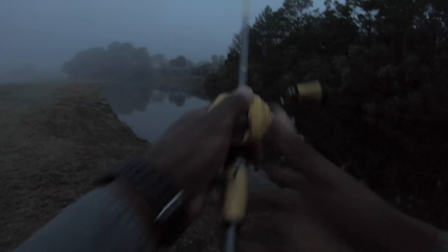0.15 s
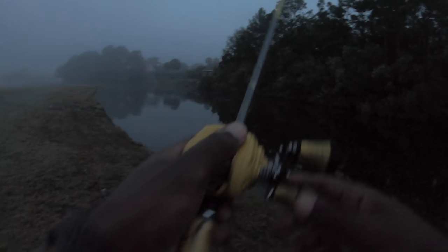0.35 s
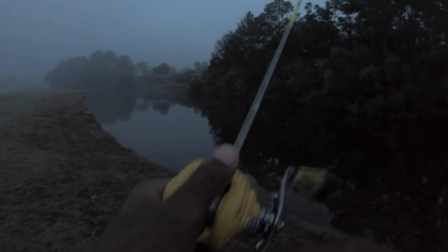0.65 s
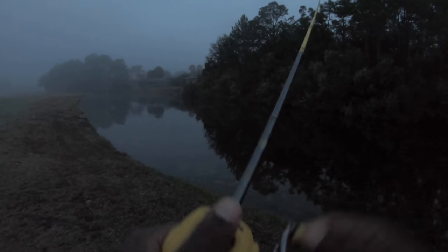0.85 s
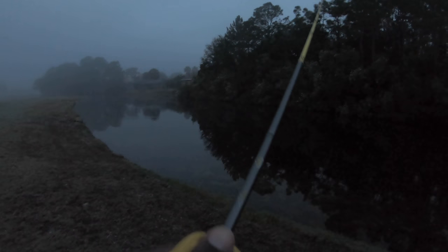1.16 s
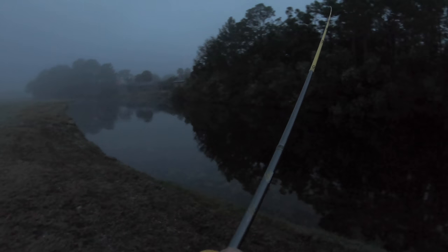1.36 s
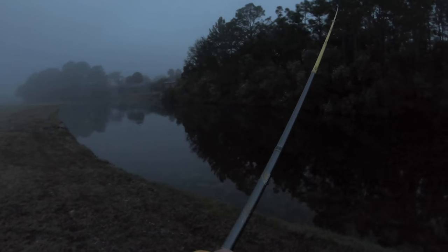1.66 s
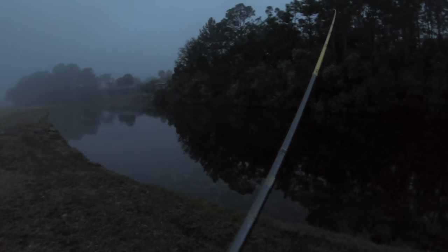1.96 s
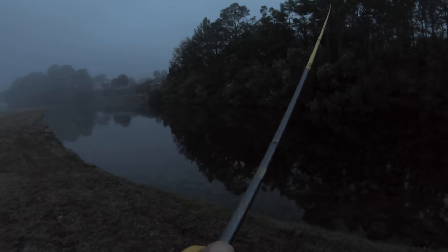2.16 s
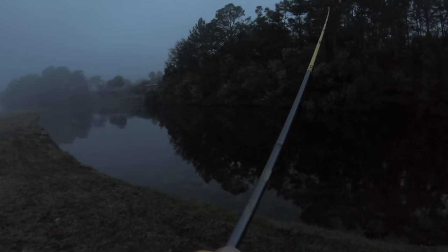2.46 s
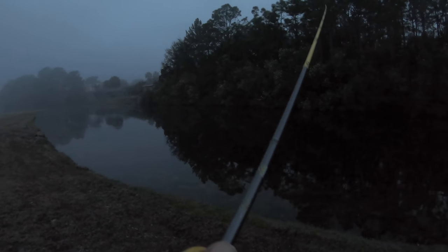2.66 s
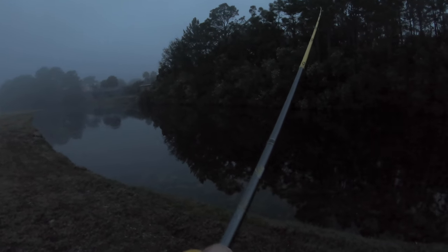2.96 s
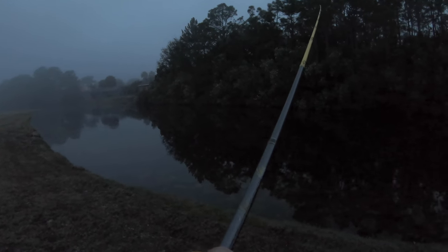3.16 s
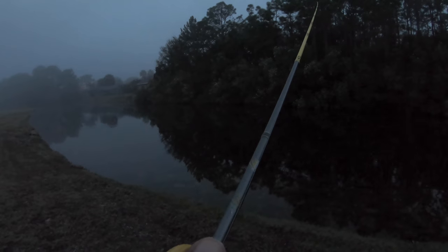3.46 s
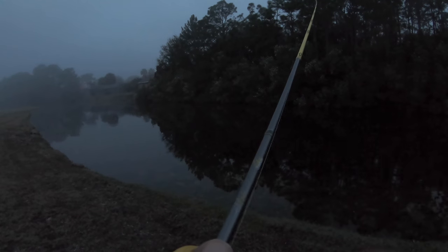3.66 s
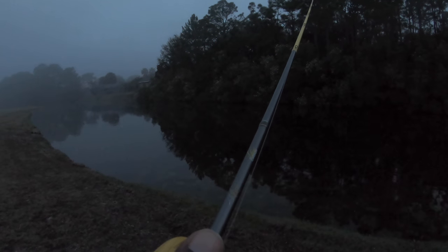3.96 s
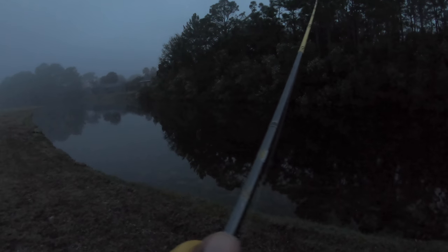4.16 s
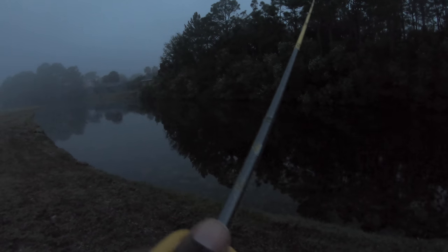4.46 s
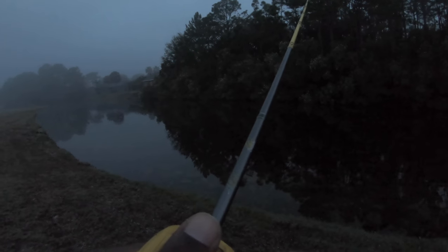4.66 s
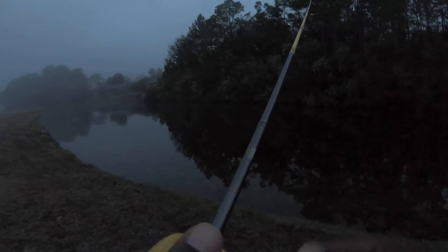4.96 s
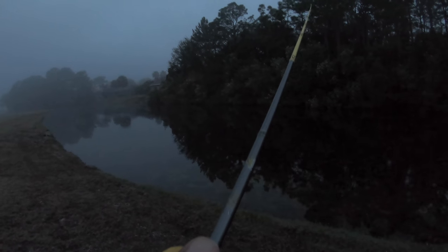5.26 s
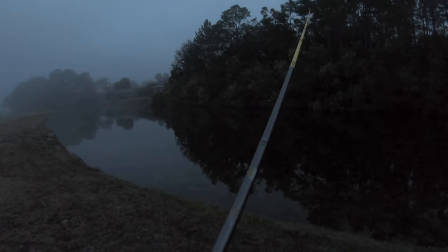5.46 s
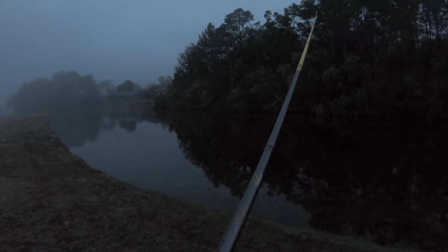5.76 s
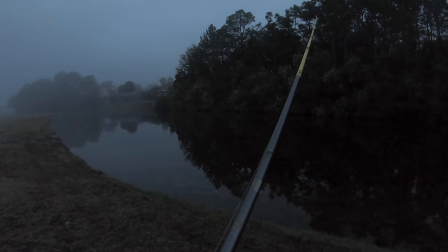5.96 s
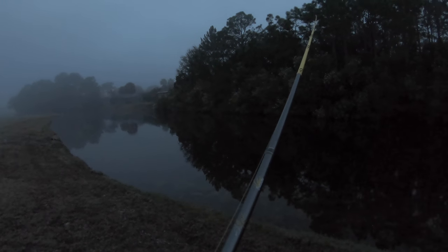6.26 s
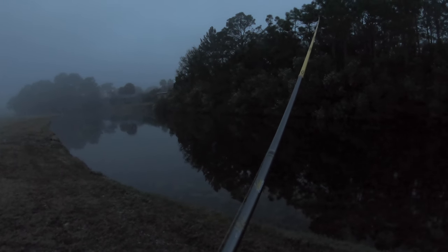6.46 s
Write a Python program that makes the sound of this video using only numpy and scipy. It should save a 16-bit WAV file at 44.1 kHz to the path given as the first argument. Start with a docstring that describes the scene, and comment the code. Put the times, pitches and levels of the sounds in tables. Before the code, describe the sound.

Close to the microphone, a hand scratches on a fishing rod and the reel clicks, then snaps into gear with a loud metallic clack. Slow winding follows, with tiny dry ticks and faint rustling swells. Around it, several songbirds whistle and chirp over each other, near and far, echoing softly from trees across a still pond, above faint air and a low wavering hum.

```python
"""Dawn birds and a fishing reel by a pond

Several songbirds whistle over each other, near and far: pure tones that follow pitch and level curves.
Trees answer them with sparse, decaying echoes. Close to the microphones a fishing reel clacks into gear
(jolts through metal resonances), then rustles and ticks as it is wound (swelling noise, tiny rings).
A hand scratches on the rod, the rod knocks low, and a wavering low hum and soft air lie beneath."""
import sys
import numpy as np
from scipy import signal
from scipy.fft import rfft, irfft, next_fast_len
from scipy.io import wavfile
from scipy.ndimage import uniform_filter1d

SR = 44100
rng = np.random.default_rng(int(sys.argv[2]) if len(sys.argv) > 2 else 0)


def store_pcm(level_fs):
    """Save levels as 16-bit WAV."""
    pcm = np.round(np.clip(level_fs, -1, 1) * 32767).astype(np.int16)
    wavfile.write(sys.argv[1], SR, np.atleast_2d(pcm).T)


N = 291501  # length in samples

# Syllables of the near bird: time_s from its start, pitch_hz before the pitch factor, relative level_db
SWOOP = [(0, 9400, -19), (.012, 8400, -6), (.022, 7260, 7.5), (.033, 5900, -4), (.041, 5330, -5),
         (.049, 5070, -14), (.06, 5060, -14)]
SAG = [(0, 2230, -10), (.02, 2150, -4), (.045, 1896, -3.5), (.068, 1740, -20)]
HOOK = [(0, 2270, 3.5), (.005, 2870, -8), (.009, 3220, 3.5), (.017, 3330, 6.5), (.026, 3250, 3),
        (.033, 2950, -17)]
# Syllables of the chipping and the sliding bird: time_s, pitch_hz before the factor, relative level_db
CHIP = [(0, 5700, -14), (.002, 6590, 9.5), (.005, 7270, 10.5), (.008, 7700, 11.5), (.011, 7640, -24)]
SLIDE = [(0, 5450, -10), (.008, 4600, -14), (.02, 4250, -10), (.04, 3980, -4.5), (.058, 3680, -11.5),
         (.082, 3300, -8)]
# Syllables of birds at middle distance: time_s, pitch_hz before the factor, relative level_db
DIP = [(0, 2824, -6.5), (.015, 2742, -3.5), (.035, 2520, -9)]
CLIMB = [(0, 2336, -20), (.025, 2620, -4.5), (.045, 2900, -2.5), (.07, 3070, -12), (.11, 3170, -8.5),
         (.15, 3222, -16), (.2, 3195, -19)]
CROOK = [(0, 2745, 2.5), (.016, 3330, -1.5), (.032, 3130, 1.5), (.052, 2730, 3), (.07, 2630, 0.5),
         (.1, 2660, -2), (.12, 2484, -12)]
GLIDE = [(0, 2970, -15), (.09, 2665, -5), (.12, 2510, -1.5), (.16, 2300, -2), (.19, 2150, -8)]
WAVE = [(0, 2268, -4), (.018, 2420, 0), (.043, 2080, -12), (.078, 2170, -6), (.108, 2337, -3),
        (.116, 2600, -6), (.126, 2160, -8), (.168, 2020, -12)]
TRILL = [(0, 2295, -2), (.02, 2680, -4.5), (.039, 2270, -1), (.051, 2646, -6), (.065, 2226, -4),
         (.079, 2535, -6), (.095, 2300, -5), (.115, 2134, -6)]
# When each syllable is sung: start_s, level_db added to the shape, pitch_factor, left_over_right_db
SWOOP_TIMES = [(0.046, -38, 1.04, -2.5), (0.311, -38, 1, -5), (0.573, -40.5, 1.014, -8.5),
               (0.834, -39.5, 0.99, -6), (1.096, -40, 1, -6.5), (1.361, -40, 0.98, -5)]
SAG_TIMES = [(.14, -47.5, 1.06, -14), (.4, -44.5, 1.04, -11), (.663, -51, 0.99, -23),
             (.925, -49.5, 0.99, -20.5), (1.188, -48, 1, -15), (1.453, -48, 0.97, -12.5),
             (1.745, -51, 0.94, -11)]
HOOK_TIMES = [(0.209, -47, 1.015, -0.5), (0.472, -48.5, 1.015, -3), (0.731, -46, 0.99, -8.5),
              (0.997, -48.5, 0.99, -7), (1.262, -49.5, .97, -8.5), (1.536, -52, .96, -13),
              (1.826, -59.5, 0.95, -14)]
CHIP_TIMES = [(.946, -48.5, 1, 1.9), (1.684, -47, 1, 2.2), (2.345, -45, 1, 2.7), (4.177, -46, 0.98, 2)]
SLIDE_TIMES = [(3.654, -57, 0.99, 0.0036), (4.021, -52.5, 0.99, 0.0053), (4.393, -53, 0.97, 0.0057),
               (4.751, -51.5, 0.99, 0.011), (5.117, -52.5, 0.99, 0), (5.408, -55, 0.95, 0),
               (5.675, -56, 0.92, 0.0056)]
DIP_TIMES = [(3.741, -50.5, 0.95, 0), (4.113, -49.5, 0.95, 0), (4.48, -49, 0.97, 0), (4.85, -48.5, 0.96, 0),
             (5.215, -50, 0.99, 0.0093)]
CLIMB_TIMES = [(3.83, -50.5, 0.96, 0), (4.203, -49, 0.98, 0), (4.563, -50, 0.96, 0.0043),
               (4.932, -49.5, 0.96, 0), (5.298, -52.5, 0.95, 0.0066)]
CROOK_TIMES = [(5.742, -55.5, 0.98, 3.3), (6.239, -56, 0.99, 6.7)]
GLIDE_TIMES = [(3.31, -57, 1.0, 19)]
WAVE_TIMES = [(3.742, -52, 0.99, 12.6)]
TRILL_TIMES = [(3.985, -53, 1.0, 14.6)]
# Single slurred notes, mostly from birds at middle distance; the row at 1.656 s is the near bird's last, slower
# swoop: start_s, length_s, first_hz, middle_hz, last_hz,
SLURRED_NOTES = [(0.332, 0.041, 2280, 2164, 1940, -57, 11), (0.455, 0.024, 3710, 3950, 3700, -56.5, 5),
                 (.515, 0.063, 4000, 3640, 3270, -62, -2), (1.592, .05, 2296, 2600, 2660, -59.5, -2),
                 (1.656, .058, 6950, 5250, 4650, -55, -5), (1.783, 0.066, 2620, 2300, 2830, -60.5, 8),
                 (2.053, 0.039, 2540, 2720, 2840, -63, 10), (2.706, 0.067, 2810, 3150, 3630, -58, 6),
                 (3.339, 0.064, 3160, 3450, 3810, -68.5, 21), (3.548, 0.053, 2800, 2430, 2290, -64.5, 19),
                 (3.604, 0.055, 2210, 2440, 2180, -56, 12), (4.131, 0.032, 2570, 2220, 2300, -57.5, 9),
                 (4.384, 0.091, 1967, 2115, 1960, -62.5, 8), (4.809, .085, 1954, 2050, 1930, -62.5, 8),
                 (5.45, 0.062, 2520, 2320, 2620, -57, -2), (5.5, 0.031, 2610, 2510, 2380, -60, -9),
                 (5.585, 0.052, 2295, 2700, 2990, -55, -7.5), (5.665, 0.074, 2420, 1980, 1840, -63.5, 7),
                 (5.925, .06, 2220, 1970, 1750, -66, 12), (5.932, 0.0317, 3550, 3300, 2800, -58, 6),
                 (5.962, 0.026, 3290, 3780, 3250, -65, 7), (5.997, 0.045, 3400, 3200, 3050, -58.5, 3),
                 (6.036, 0.039, 2090, 2290, 2200, -59.5, 10), (6.154, 0.027, 3270, 3150, 3060, -65, 3),
                 (6.197, .03, 3070, 3300, 3000, -62, -2), (6.171, 0.061, 2170, 1860, 1780, -61, 12),
                 (6.413, 0.058, 2124, 2000, 1780, -65, 13.5), (6.419, 0.064, 3070, 3050, 3110, -64, 0),
                 (6.49, 0.031, 3090, 3320, 2870, -58, 4), (6.53, 0.026, 3140, 3430, 3150, -67, 1)]
# Contacts on the reel: start_s, peak level_db before panning, brightest_hz, contact_s,
# left_over_right_db, left_lag_s
REEL_BLOWS = [(0.0381, -25.5, 1050, 0.000077, -17, .00001), (0.1223, -35, 3000, 0.00086, -5, .00003),
              (0.1449, -17.5, 3220, 0.0001, 1, 0.00002), (0.159, -29, 3300, 0.00076, -1, .00003),
              (0.169, -29, 3470, 0.0012, 6, 0.000033), (0.276, -37.5, 1000, 0.0011, -3, .00001),
              (0.6329, -13, 4870, 0.00037, -7.5, 0.000069), (0.6354, -3, 1900, 0.00013, 5.5, 0.0000089),
              (0.6375, -6, 4470, 0.0011, 1, 0.000034), (0.6382, -5, 6370, 0.0014, -6, 0.000035),
              (0.642, -18, 2400, 0.0042, -9.5, .00003), (2.837, -44, 1500, 0.0023, -11, .00001),
              (3.511, -42, 3120, 0.00072, -19, .00001)]
# Resonances of the reel: pitch_hz, width_hz, relative level_db
REEL_MODES = [(880, 1700, -9.5), (1720, 480, -2.5), (2920, 220, -6), (3386, 180, -4), (3970, 490, -10),
              (4670, 430, -7.5), (5970, 500, -14), (7500, 350, -10.5), (7390, 250, -3.5), (9160, 180, -2),
              (10140, 470, -6.5), (10620, 610, -10), (13650, 1800, -18.5)]
# Clear gear ticks while winding: start_s, peak level_db before panning
GEAR_TICKS = [(0.8265, -40), (0.8619, -38), (0.929, -40.5), (1.0056, -40), (1.062, -44), (1.0807, -42),
              (1.184, -43), (1.279, -39.5), (1.4909, -41), (1.6212, -47), (1.733, -47), (1.807, -38.5),
              (1.8622, -46.5), (2.2836, -49), (2.3173, -43), (2.6645, -41.5), (2.8255, -47),
              (2.9157, -35.5), (3.0976, -40), (3.1977, -37.5), (3.23, -42.5), (3.4178, -43), (3.5498, -46),
              (3.633, -39), (3.8432, -41), (3.933, -35.5), (4.0008, -46.5), (4.0677, -50), (4.1644, -47),
              (4.4596, -43), (4.6216, -44), (4.7216, -40.5), (4.7945, -46), (4.81, -43), (4.9518, -45.5),
              (5.061, -45), (5.116, -39), (5.1294, -46), (5.1437, -34.5), (5.1856, -40.5), (5.2056, -45),
              (5.2344, -44), (5.2428, -35.5), (5.2644, -43), (5.28, -45), (5.3725, -36.5), (5.576, -36),
              (5.683, -41.5), (5.775, -37), (5.7905, -31), (5.8618, -40.5), (6.0485, -46.5), (6.1439, -44)]
# Resonances of a tick: pitch_hz, width_hz, relative level_db
TICK_MODES = [(4500, 3000, -20), (7300, 1200, -14), (8900, 600, -6), (9700, 500, 0), (14000, 2000, -27)]
# Turns of the handle: arrival_s, hold_s, rub level_db, fizz level_db, left_over_right_db of the rub
HANDLE_TURNS = [(0.023, 0.067, -50, -52.5, -8), (0.75, 0.05, -53, -60.5, -0.5),
                (1.127, 0.085, -58.5, -60, -4), (1.72, 0.088, -62, -69.5, -1.5),
                (2.255, .17, -64, -68.5, -0.5), (2.85, .07, -58, -64, -1.5),
                (3.5, 0.037, -57.5, -65.5, -1.5), (4.015, 0.12, -59.5, -67.5, -3),
                (4.646, 0.065, -57, -67.5, -1), (5.22, .16, -58.5, -64.5, -1.5),
                (5.848, 0.11, -58.5, -66.5, -2), (6.55, .1, -57, -68, -3.5)]
# Spectra of the rubbing and its fizz: pitch_hz, relative level_db per Hz
RUB_SPECTRUM = [(200, -64.5), (450, -21), (900, 1), (1500, 2.5), (2500, -2), (4500, -7.5), (7000, -52)]
FIZZ_SPECTRUM = [(2000, -2), (4000, -20.5), (7000, 4.5), (10000, -7.5), (11500, -20), (14500, -57.5),
                 (16000, -30)]
# Level of the hand shifting on the rod: time_s, level_db before panning
GRIP_LEVEL = [(0, -51.5), (.06, -49.5), (.1, -51), (.135, -41), (.18, -46), (.25, -49), (.29, -57.5),
              (0.362, -71)]
# Spectrum of that hand: pitch_hz, relative level_db per Hz
GRIP_SPECTRUM = [(100, -15), (250, 7), (500, -3.5), (1200, 1), (3000, -11.5), (6000, -10), (10500, -16.5),
                 (12000, -29), (15500, -40)]
# Low knocks through the rod: start_s, starting level_db before panning, pitch_hz, t60_s
ROD_THUMPS = [(0.116, -38.5, 242, 0.03), (0.129, -32.5, 171, 0.064), (0.637, -38, 163, 0.059),
              (2.868, -49, 294, 0.19), (3.583, -57, 172, 0.1)]
# Decay of the echoes from the trees: pitch_hz, t60_s
TREE_DECAY = [(1500, 0.23), (3000, 0.46), (8000, 0.26)]
# Strength of those echoes, strongest at the lower pitches and weakest in the treble: pitch_hz, relative
# level_db
TREE_COLOUR = [(1500, 3.5), (3000, 1.5), (5000, 1), (8000, 0)]
# Low resonances of the hum, each pass of two: pitch_hz, width_hz, relative level_db
HUM_MODES = [(45, 17, -10.5), (151.3, 23.4, -4.5), (176.4, 19, -0.5), (230.6, 81, -8)]
# Spectrum of the air: pitch_hz, relative level_db per Hz
AIR_SPECTRUM = [(12, -47), (20, -4), (53, -3.5), (96, -16.5), (172, -2), (285, -8), (513, -16.5), (802, -7),
                (949, -18), (1400, -9.5), (3070, -12), (4420, -22), (5230, -12.5), (9950, -40.5),
                (16000, -57.5)]
# Likeness of the noises at the two microphones: pitch_hz, likeness (-1 to 1)
STEREO_LIKENESS = [(60, 0.56), (130, 0.12), (290, 0.3), (640, -0.27), (1410, 0.21), (3100, 0.98),
                   (6820, -0.11), (15000, 0.3)]
# Lean of the noises: pitch_hz, left_over_right_db
STEREO_LEAN = [(60, -2), (110, -2), (200, -0.5), (380, 0), (700, -2), (1290, 1.5), (2380, -2), (4400, -0.5),
               (8120, -2.5), (15000, -9)]

NOTE_START_DB, NOTE_END_DB = -2.5, -3  # ends of a slurred note against its middle
TWITTER_FROM_S, TWITTER_HZ, TWITTER_DB = 5.9, 3200, -68.5  # pitch is central, level the softest
SMALL_TICKS_PER_S, SMALL_TICKS_DB = 60, -69.5  # level of the smallest, before panning
RISE_DB_PER_S, FALL_DB_PER_S = 54, 28  # rustle before and after each turn
FAR_PER_S, FAR_DB = 55, -72  # far chirps, softest level before the echoes
HUM_DB, WAVER_DB, WAVER_S = -64, 2.5, 0.057
AIR_DB = -60.5
DUCK_FROM_DB, DUCK_SHARE, RECOVER_DB_PER_S = -33.5, 0.36, 197  # recovery of the detector
EDGE_HZ = 16300  # upper band limit


def amp(db):
    """Decibels to amplitude."""
    return 10 ** (np.asarray(db) / 20)


def evened(x):
    """Scales a signal to an RMS of one."""
    return x / np.sqrt(np.mean(x ** 2) + 1e-20)


def read(points, hz):
    """Reads a curve between its points on a log frequency scale."""
    f, value = np.transpose(points)
    return np.interp(np.log(hz + 1), np.log(f + 1), value)


def add(mix, start_s, sound, pan_db):
    """Places a sound at both microphones; positive pan_db leans left."""
    part = mix[:, round(start_s * SR):][:, :sound.shape[-1]]
    part += amp([[pan_db / 2], [-pan_db / 2]]) * sound[..., :part.shape[1]]


def late(mix, lag_s):
    """Delays the left microphone by lag_s through a phase slope."""
    size = next_fast_len(mix.shape[1] + 8)
    hz = np.fft.rfftfreq(size, 1 / SR)
    delay = np.exp(-2j * np.pi * hz * [[lag_s], [0]])
    return irfft(rfft(mix, size) * delay, size)[:, :mix.shape[1]]


def ring(x, modes):
    """Sum of two-pole resonances of alternating sign."""
    out = 0
    for k, (hz, width_hz, db) in enumerate(modes):
        b, a = signal.iirpeak(hz, hz / width_hz, SR)
        out = out + (-1) ** k * amp(db) * signal.lfilter(b, a, x)
    return out


def noise(spectrum, size, patchy_db, flicker_db):
    """Stereo noise with drifting patches and a flicker shared by all pitches."""
    frames, hz = 4 * N // size + 5, np.fft.rfftfreq(size, 1 / SR)
    a, b, c, d, patches = rng.standard_normal((frames, len(hz), 5)).T
    patches = uniform_filter1d(patches, size=8, axis=0)  # across pitch
    patches = evened(uniform_filter1d(patches, size=12, axis=1))  # across time
    same = np.clip(read(STEREO_LIKENESS, hz), -1, 1)[:, None]
    left, other = a + 1j * b, c + 1j * d
    z = np.array([left, same * left + np.sqrt(1 - same ** 2) * other])
    flicker = flicker_db * rng.standard_normal(frames)
    z *= amp(read(spectrum, hz)[:, None] + patchy_db * patches + flicker)
    z *= amp(np.outer([.5, -.5], read(STEREO_LEAN, hz)))[:, :, None]
    return evened(signal.istft(z, nperseg=size, noverlap=size - size // 4)[1][:, :N])


def whistle(rows, flutter):
    """A pure tone on a pitch curve, with a fast unevenness of level."""
    s, hz, db = np.transpose(rows)
    t = np.arange(s[0], s[-1], 1 / SR)
    round_off = len(t) // (3 * len(s)) + 1  # samples over which pitch corners are rounded
    hz = uniform_filter1d(np.interp(t, s, hz), round_off)
    uneven = 1 + flutter * evened(uniform_filter1d(rng.standard_normal(len(t)), size=150))
    level = np.sqrt(2) * amp(np.interp(t, s, db)) * uneven
    tone = np.sin(2 * np.pi * np.cumsum(hz) / SR)
    return level * signal.windows.tukey(len(t), .15) * tone


def singer(parts, flutter, lag_s):
    """Repeats whistled syllables at their times, levels, pitches and sides."""
    out = np.zeros((2, N))
    for shape, times in parts:
        for start_s, db, factor, pan_db in times:
            syllable = whistle(np.multiply(shape, [1, factor, 1]), flutter)
            add(out, start_s, amp(db) * syllable, pan_db)
    return late(out, lag_s)


def near_bird():
    """A near bird whistling a fast swoop, a sag and a hook of pitch."""
    parts = [(SWOOP, SWOOP_TIMES), (SAG, SAG_TIMES), (HOOK, HOOK_TIMES)]
    return singer(parts, flutter=0.18, lag_s=.00006)


def chipping_bird():
    """Very short chips that shoot upward in pitch."""
    return singer([(CHIP, CHIP_TIMES)], flutter=0.075, lag_s=.000035)


def sliding_bird():
    """High whistles that slide down."""
    return singer([(SLIDE, SLIDE_TIMES)], flutter=0.3, lag_s=.00001)


def dipping_and_climbing_bird():
    """Whistles at middle distance that dip, then climb, with a strong flutter."""
    return singer([(DIP, DIP_TIMES), (CLIMB, CLIMB_TIMES)], flutter=0.53, lag_s=.00001)


def warblers():
    """Birds at middle distance, plus the near bird's last slower swoop: notes bent through three pitches,
    loudest midway, and longer shapes."""
    out = np.zeros((2, N))
    for start_s, length_s, first_hz, middle_hz, last_hz, db, pan_db in SLURRED_NOTES:
        rows = [(0, first_hz, db + NOTE_START_DB),
                (length_s / 2, middle_hz, db),
                (length_s, last_hz, db + NOTE_END_DB)]
        add(out, start_s, whistle(rows, flutter=0.41), pan_db)
    parts = [(CROOK, CROOK_TIMES), (GLIDE, GLIDE_TIMES), (WAVE, WAVE_TIMES), (TRILL, TRILL_TIMES)]
    return out + singer(parts, flutter=0.15, lag_s=0)


def twitter(count):
    """A distant bird's quick bent strokes of pitch, scattered at random."""
    out = np.zeros((2, N))
    for place, pitch, bend, size in rng.random((count, 4)):
        hz, db = TWITTER_HZ * (.95 + .1 * pitch), TWITTER_DB + 5 * size
        rows = [(0, hz, db), (.007, hz * (.92 + 0.21 * bend), db), (.018, .94 * hz, db - 12)]
        start_s = TWITTER_FROM_S + place * (N / SR - TWITTER_FROM_S)
        add(out, start_s, whistle(rows, flutter=0.5), 6)
    return out


def reel_blows():
    """Each contact is a short jolt that rings the reel, favouring modes near its brightest pitch."""
    out, t = np.zeros((2, N)), np.arange(900) / SR
    for start_s, db, bright_hz, contact_s, pan_db, lag_s in REEL_BLOWS:
        shared, left, right = rng.standard_normal((3, len(t)))
        jolt = np.exp(-t / contact_s) * (0.32 * shared + 0.22 * np.array([left, right]))
        jolt[:, 8] = 1  # a single sharp impulse within the noise
        soft = [(bright_hz, 1.1 * bright_hz, 0)]  # little passes far from the brightest pitch
        softened = ring(ring(jolt, soft), soft)
        modes = [(hz, width_hz, level_db - 4 * abs(np.log2(hz / bright_hz)))
                 for hz, width_hz, level_db in REEL_MODES]
        sound = ring(softened, modes)
        add(out, start_s, late(amp(db) * sound / abs(sound).max(), lag_s), pan_db)
    return out


def reel_ticks():
    """Tiny dry gear ticks, noise bursts through resonances: clear ones and a scatter of small ones."""
    out, t = np.zeros((2, N)), np.arange(300) / SR
    draws = rng.random((600, 2))[:int(SMALL_TICKS_PER_S * N / SR)]
    small = [(place * N / SR, SMALL_TICKS_DB + min(-4 * np.log(1 - size), 14))
             for place, size in draws]
    for start_s, db in GEAR_TICKS + small:
        burst = t * np.exp(-t / 0.00059) * rng.standard_normal(len(t))
        sound = ring(burst, TICK_MODES)
        add(out, start_s, amp(db) * sound / abs(sound).max(), -7.5)
    return late(out, lag_s=.000055)


def rustle():
    """Grainy rubbing and fizz that swell quickly with each turn of the handle and die slowly."""
    arrival_s, hold_s, rub_db, fizz_db, pan_db = np.transpose(HANDLE_TURNS)[:, :, None]
    t = np.arange(N) / SR
    rise_db = -RISE_DB_PER_S * np.maximum(arrival_s - t, 0)
    swell_db = rise_db - FALL_DB_PER_S * np.maximum(t - arrival_s - hold_s, 0)
    # overlapping turns add in power
    rub_level = [np.linalg.norm(amp(rub_db + swell_db + side * pan_db), axis=0) for side in (.5, -.5)]
    fizz_level = np.linalg.norm(amp(fizz_db + swell_db), axis=0)
    rub = noise(RUB_SPECTRUM, size=256, patchy_db=2, flicker_db=2)
    fizz = noise(FIZZ_SPECTRUM, size=256, patchy_db=2, flicker_db=2)
    return rub_level * rub + fizz_level * fizz


def grip():
    """A hand shifts on the rod: a broad scratchy rub, panned toward the right microphone."""
    level = amp(np.interp(np.arange(N) / SR, *np.transpose(GRIP_LEVEL), right=-200))
    scratch = noise(GRIP_SPECTRUM, size=256, patchy_db=2.5, flicker_db=2)
    return level * amp([[-3], [3]]) * scratch


def thumps():
    """Damped low swings of the rod, each a decaying sine."""
    out, t = np.zeros((2, N)), np.arange(6000) / SR
    for start_s, db, hz, t60_s in ROD_THUMPS:
        add(out, start_s, amp(db - 60 * t / t60_s) * np.sin(2 * np.pi * hz * t), -1.5)
    return out


def far_chorus():
    """Faint short slurs scattered from left to right."""
    out = np.zeros((2, N))
    for place, pitch, glide, length, size, side in rng.random((400, 6))[:int(FAR_PER_S * N / SR)]:
        hz, db = 1700 + 2000 * pitch, FAR_DB + 6 * size
        rows = [(0, hz, db), (.012 + .03 * length, hz * (.8 + .4 * glide), db - 3)]
        add(out, place * N / SR, whistle(rows, flutter=0.54), 8 * (side - .5))
    return out


def trees(x, start_s):
    """Sparse echoes of random sign, one in every 20 samples, other ones for each microphone."""
    size = SR // 2
    taps = np.zeros((2, size))
    at = np.arange(0, size - 20, 20) + rng.integers(0, 20, (2, SR // 40))
    np.put_along_axis(taps, at, rng.choice([-1., 1.], at.shape), 1)
    taps *= np.clip(np.arange(size) / (start_s * SR), 0, 1)  # fades in over start_s
    hz, t, z = signal.stft(taps, SR, nperseg=128)
    decay_db = -60 * t / read(TREE_DECAY, hz)[:, None]
    colour_db = read(TREE_COLOUR, hz)[:, None]
    tail = signal.istft(z * amp(colour_db + decay_db), SR, nperseg=128)[1]
    return signal.fftconvolve(x, tail / np.linalg.norm(tail[0]), axes=1)[:, :N]


def hum():
    """Noise in low resonances, mostly alike at both microphones; its level wavers at random."""
    shared, left, right, drift = rng.standard_normal((4, N))
    source = np.array([shared + 0.71 * left, shared + 0.72 * right])
    low = ring(ring(source, HUM_MODES), HUM_MODES)
    span = round(WAVER_S * SR)
    waver = evened(uniform_filter1d(uniform_filter1d(drift, span), span))
    return amp(HUM_DB + WAVER_DB * waver) * evened(low)


def air():
    """The soft, nearly steady noise of the open place."""
    return amp(AIR_DB) * noise(AIR_SPECTRUM, size=1024, patchy_db=1.8, flicker_db=0.2)


def scene():
    """Birds with their echoes, the reel close by, hum and air beneath."""
    near, chips, slides = near_bird(), chipping_bird(), sliding_bird()
    middle = dipping_and_climbing_bird() + warblers() + twitter(count=14)
    reel = reel_blows() + reel_ticks() + rustle() + grip() + thumps()
    to_trees = amp(-6.5) * near + amp(-5.0) * chips + amp(3) * slides
    to_trees += amp(-8) * middle  # across open water: weaker echoes
    to_trees += far_chorus()  # heard only through the trees
    echoes = trees(to_trees, start_s=0.0016)
    return near + chips + slides + middle + echoes + reel + hum() + air()


def record(dry):
    """Gain control ducks sounds above a threshold and recovers; then the band limit."""
    power = uniform_filter1d((dry ** 2).mean(0), size=200, origin=99)  # over the samples just past
    power_db = 10 * np.log10(abs(power) + 1e-12)
    fall_db = np.arange(N) * RECOVER_DB_PER_S / SR
    held_db = np.maximum.accumulate(power_db + fall_db) - fall_db  # peaks that fall steadily
    over_db = np.maximum(held_db - DUCK_FROM_DB, 0)
    ducked = dry / amp(DUCK_SHARE * uniform_filter1d(over_db, size=600, origin=299))
    band = signal.firwin(511, EDGE_HZ, window=("kaiser", 9), fs=SR)
    return signal.oaconvolve(ducked, band[None], "same")


dry = scene()
out = record(dry)
store_pcm(out)
```